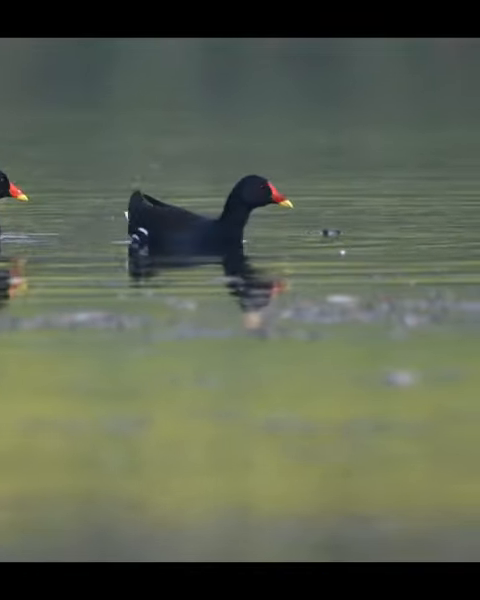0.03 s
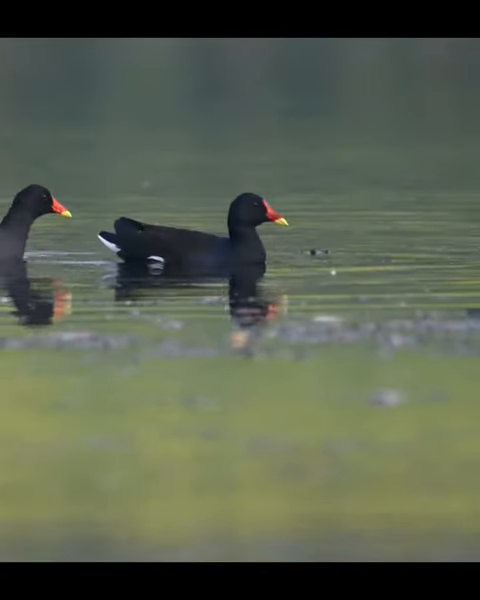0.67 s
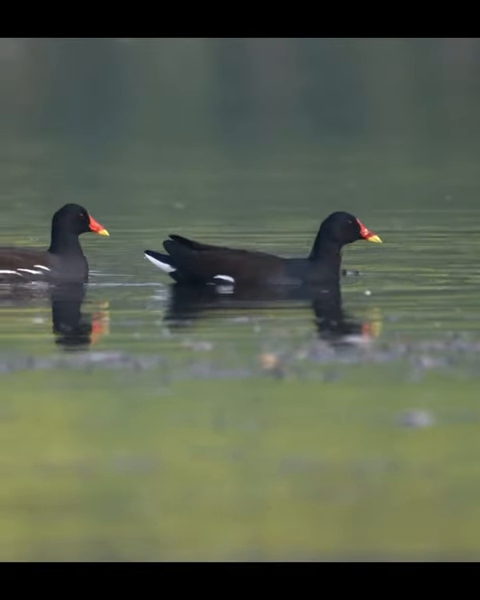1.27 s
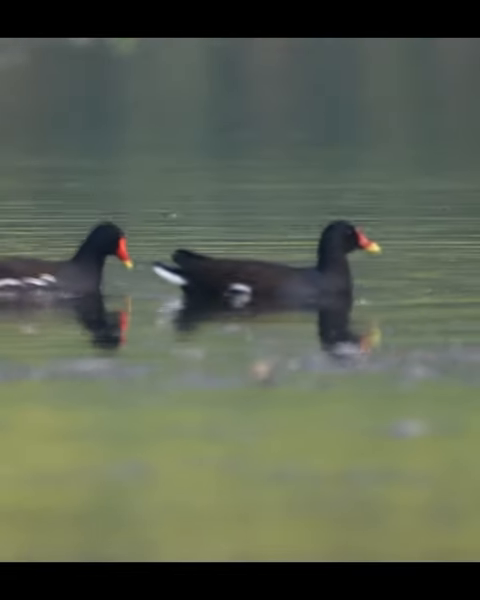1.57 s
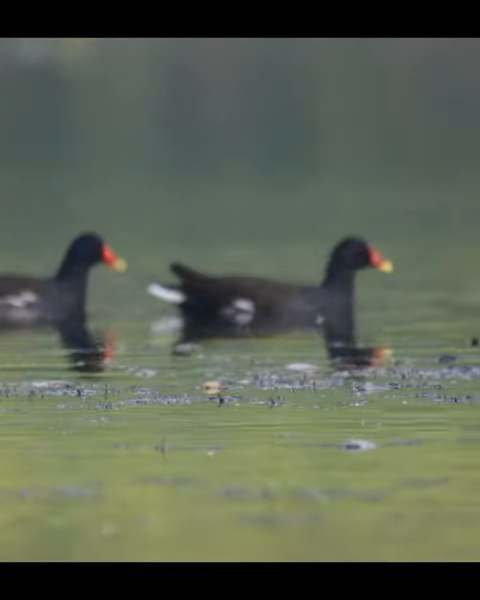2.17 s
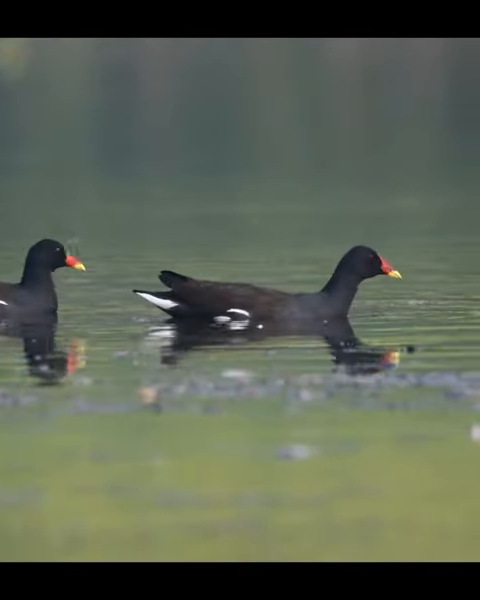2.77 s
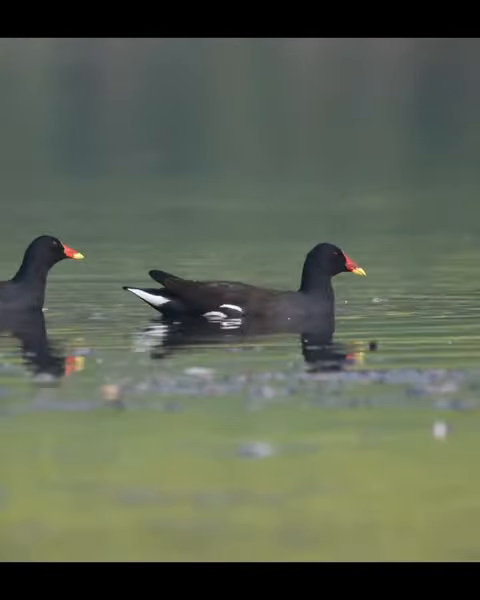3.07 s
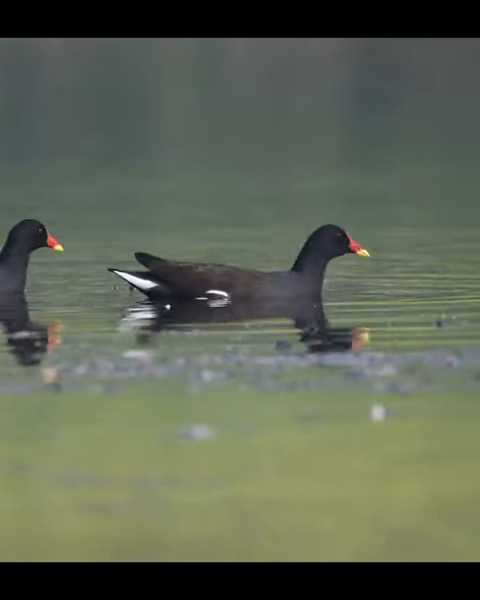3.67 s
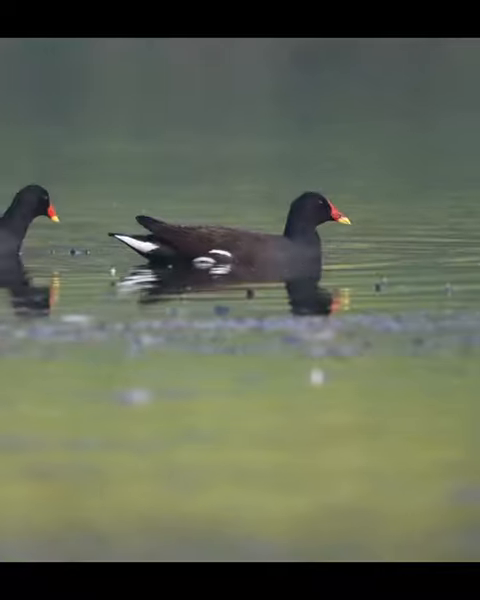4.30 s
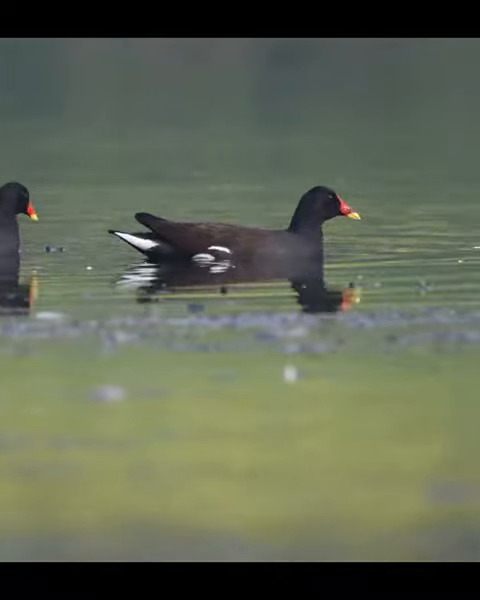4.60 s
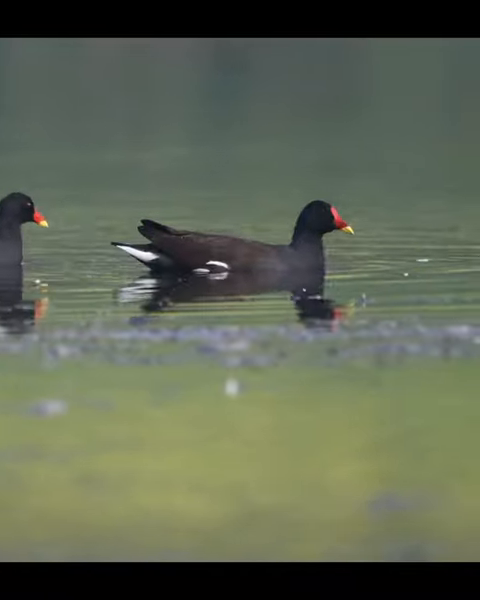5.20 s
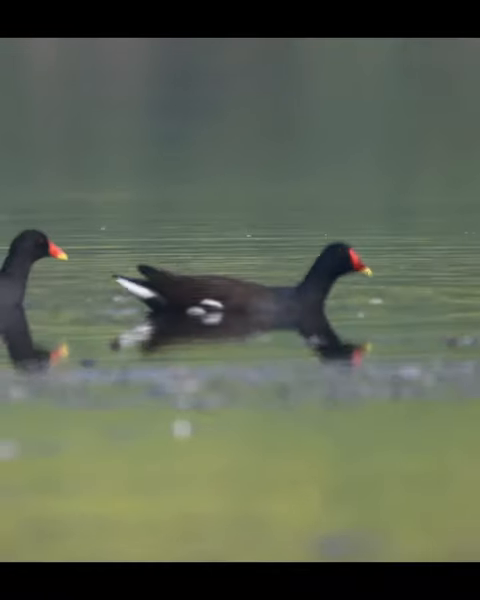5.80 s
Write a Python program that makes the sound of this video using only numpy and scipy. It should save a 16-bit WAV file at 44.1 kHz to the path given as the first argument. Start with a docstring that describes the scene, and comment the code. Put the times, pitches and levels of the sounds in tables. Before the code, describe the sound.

Moorhens call close by on a pond, each call very short, with a slight echo from reeds and bank. A sharp, piercing kek opens at 0.1 seconds. Three round clucks follow at 0.5, 0.9 and 1.2, the first the loudest and slightly overloaded. Two more keks come at 1.8 and 2.3. From 3.0 to 3.4 there is a quick cry of three falling notes. A rasping squawk sounds at 3.8, two clucks at 4.3 and 4.7, a second squawk at 4.9 and a last kek at 5.4.

Behind them, bush crickets hiss faintly and steadily, the nearest to the right, over a soft distant hum. Tiny dry ticks come now and then, clustering around 1.5 seconds. A light breeze rumbles on the microphones, a little more on the left, with its strongest buffets between 3.5 and 4.8 seconds.

```python
"""Moorhens on a pond

A pair of microphones by the water takes round clucks, sharp keks, a three-note cry and two rasping
squawks, each voiced in the syrinx, shaped by the throat and echoed by near reeds and the wooded bank.
Bush crickets hiss in the reeds, small dry ticks come now and then, and a breeze buffets the microphones.
The loudest calls overload the input."""
import sys
import numpy as np
from scipy import signal
from scipy.fft import rfft, irfft, next_fast_len
from scipy.io import wavfile
from scipy.ndimage import map_coordinates

SR = 44100
rng = np.random.default_rng(int(sys.argv[2]) if len(sys.argv) > 2 else 0)


def wrap_up_sound(samples):
    """Save the sound to the file named by the first command line argument, as 16-bit audio."""
    columns = np.atleast_2d(samples).T
    # keep every value between -1 and 1, then stretch to whole-number steps
    tamed = np.clip(columns, -1, 1)
    steps = np.round(tamed * 32767).astype(np.int16)
    wavfile.write(sys.argv[1], SR, steps)


N = 266805

# Levels in the tables are relative: each source adds its own gain. Roughness runs from 0 to 1.
# Each row: start in seconds, length in seconds, top pitch in Hz, level in dB, roughness,
# closing note in dB.
CLUCK_CALLS = [ (.539, 0.061, 1043, -0.5, 0.005, -3), (.870, 0.082, 1071, -5, 0.055, -8),
               (1.239, 0.063, 1069, -3.5, 0.0067, -4.5), (4.331, .076, 1077, -4.5, 0.057, -5.5),
               (4.712, 0.056, 1058, -2.5, 0.011, -6)]
# Each row: start in seconds, length in seconds, pitch in Hz, level in dB, lead-in length and attack
# in seconds, lead-in level in dB, closing rasp in dB.
KEK_CALLS = [ (.077, 0.04, 1010, -9.5, 0.058, 0.055, -8.5, -11.5),
             (1.803, .038, 1010, -10.5, 0.062, 0.009, -16, -9.5),
             (2.256, 0.047, 1011, -13, .084, 0.059, -12, -12),
             (5.436, 0.045, 1016, -11.5, 0.076, 0.067, -10, -13)]
# Each row: start in seconds, length in seconds, pitch in Hz, level in dB, roughness, throat resonance
# and shoulder pitch in Hz, scoop length in seconds, scoop and tail levels in dB.
CRY_NOTES = [ (3.040, 0.045, 963, -7.5, 0.059, 2900, 878.4, 0.049, -7, -7.5),
             (3.165, .058, 845.5, -13, 0.022, 2313, 809, 0.033, -9.5, -19),
             (3.291, 0.066, 788.7, -7, 0.18, 2370, 799, .044, -10.5, -16.5)]
# Each row: start in seconds, length in seconds, pitch in Hz, level in dB, hoarse rise in dB,
# accent pitch in Hz, accent level in dB.
SQUAWK_CALLS = [ (3.838, .066, 827.7, -6, -11.5, 943, -12), (4.937, .066, 827, -6.5, -13.5, 938, -12)]
# Each row: start in seconds, length in seconds, pitch in Hz, level in dB, octave against the note in dB.
COO_NOTES = [(3.165, 0.082, 838, -33.5, -12), (3.312, 0.051, 792.5, -23, -18), (3.638, 0.056, 858, -30, -8),
             (3.682, 0.075, 849, -47.5, 14.5), (3.919, 0.024, 931, -22, -24),
             (5.023, 0.033, 924, -24.5, -10)]
# Colour of each call through neck and bill. Each row: frequency in Hz, level in dB.
CLUCK_COLOUR = [(500, -40.5), (830, -26.5), (1050, -4.5), (1350, 18), (1700, 6), (2150, 0), (2700, -58),
                (3200, -14.5), (4200, -9.5), (6000, -16), (10000, -22), (15000, -50.5)]
KEK_COLOUR = [(400, -33), (850, 3), (1050, 11.5), (1350, 0), (1750, 14), (2300, 18), (3000, 10),
              (3500, 8.5), (4300, -2), (5300, 1), (7000, -9.5), (9500, -12.5), (11000, -39), (14000, -23)]
CRY_COLOUR = [(400, -17), (830, -12), (1250, -0.5), (1680, 9.5), (2100, 3.5), (2600, -1.5), (3300, -6.5),
              (4000, -7.5), (5000, -23), (8000, -12), (10000, -28), (15000, -35)]
SQUAWK_COLOUR = [(400, -18.5), (850, -14.5), (1100, -1.5), (1400, 11), (1700, 9), (2200, 0.5), (2800, -6),
                 (3300, 0.5), (4100, -3), (5200, -16), (8000, -22.5), (11000, -32.5), (15000, -40)]
# The birds at the two microphones. Each row: frequency in Hz, left over right in dB, left lead in radians.
MIC_DIFFERENCES = [(400, 1, 0), (830, 4, 0), (1050, 6, .7), (1350, 0, 3.5), (1670, -10, 4), (1900, -18, 5),
                   (2130, -19, 6.1), (2380, -8, 5.4), (2650, -5, 7.5), (2900, 6, 6.4), (3300, -2, 5.9),
                   (4050, 4, 6.6), (4600, -1, 5.3), (9000, -3, 5.5)]
# Echo of the wooded bank. Each row: frequency in Hz, time to fall 60 dB in seconds.
BANK_DECAY = [(300, 0.53), (1000, 0.47), (2000, 0.71), (3000, 0.6), (4000, 0.63), (5500, 0.045),
              (12000, 0.33)]
# Each row: start in seconds, level in dB, offset of the low ring in dB.
DRY_TICKS = [(0.723, -31.5, 11), (1.065, -29, -22), (1.216, -27, 3), (1.4596, -26, -3),
             (1.4805, -25.5, 14.5), (1.4946, -30, 6), (1.57, -29, 9), (1.6164, -24.5, 6), (1.718, -26, 13),
             (1.732, -24.5, 8.5), (2.094, -26.5, 8), (2.178, -30, 15), (2.666, -28, 7), (4.555, -23.5, 3.5),
             (5.6575, -32, -24), (5.68, -38.5, -13), (5.8913, -23.5, 8.5), (5.9721, -27, 3)]
# The nearest cricket and the chorus in the reeds. Each row: frequency in Hz, level in dB.
CRICKET_SPECTRUM = [(4000, -29.5), (4800, -24.5), (5250, -3.5), (5550, 5), (6000, -5), (6400, -1),
                    (7200, -65), (8000, -34)]
CHORUS_SPECTRUM = [(4000, -21.5), (5000, 4.5), (5600, -2), (6100, 10.5), (6350, -48), (6650, 8), (7100, 2),
                   (7500, -6.5), (8000, -56)]
# The steady breeze on the microphones. Each row: time in seconds, level in dB.
BREEZE_LEVELS = [(0, -46), (1.2, -47), (1.32, -33.5), (1.58, -44), (1.72, -46.5), (3.38, -44),
                 (3.47, -27.5), (3.66, -35), (4.3, -39.5), (4.78, -29.5), (4.9, -47), (5.05, -35),
                 (5.2, -38), (5.52, -30), (5.65, -41.5), (6.05, -44)]
# Each row: time of the peak in seconds, length in seconds, level in dB.
BREEZE_GUSTS = [(0.218, 0.022, -27.5), (1.278, 0.023, -25), (1.553, 0.077, -28.5), (3.105, 0.025, -33),
                (3.567, 0.043, -24), (3.713, 0.048, -14.5), (3.763, 0.066, -19.5), (3.958, 0.042, -14),
                (4.035, 0.053, -17), (4.145, 0.05, -21), (4.277, 0.038, -19), (4.381, 0.081, -23),
                (4.594, 0.037, -23.5), (4.719, 0.073, -21), (5.114, 0.02, -28), (5.574, 0.021, -27)]
# Wind buffet, far hum, open air and high fizz. Each row: frequency in Hz, level in dB.
BUFFET_SPECTRUM = [(12, -54), (20, -34), (59, 2.5), (114, 1.5), (179, -7), (252, -18), (278, -18),
                   (392, -23), (600, -36), (780, -85), (1320, -120)]
HUM_SPECTRUM = [(60, 1.5), (130, 4.5), (260, -13), (450, -4), (600, -16.5), (850, -11.5), (1400, -44)]
AIR_SPECTRUM = [(200, -45), (500, -5.5), (650, -17), (900, -1.5), (1700, -2.5), (2600, -10.5), (4500, -27),
                (6000, -28.5)]
FIZZ_SPECTRUM = [(3000, 3), (4500, 5), (7500, -20), (9000, -10), (11000, -6), (13000, -19), (15500, -33)]


def clucks():
    """Round clucks arch on their second harmonic, then drop to a short low note."""
    close_hz = 818.6
    notes = []
    for start, length, hz, db, rough, close_db in CLUCK_CALLS:
        notes += [
            note(start, length, hz, db, rough, throat_hz=2 * hz, attack_s=.006, release_s=.01,
                 sag=.115, droop_db=5, rise=-.03, fray=.14),
            note(start + length, .016, close_hz, close_db, rough=.09, throat_hz=2 * close_hz,
                 attack_s=.005, release_s=.035)]
    call = voice(notes, CLUCK_COLOUR, gain_db=-3, peak_db=18, width_hz=894,
                 flutter_db=3.5, flutter_hz=86.2, jitter=.03, rasp_hz=705, rasp_gain=2)
    return pond_echoes(call, reeds_db=-11.5, reeds_t60=.18, bank_db=-36.5)


def keks():
    """A soft lead-in cracks, jumps to a piercing fourth harmonic and ends in a rasp."""
    lead_hz, close_hz, crack_s = 863.7, 810, .018
    notes, other_side = [], []
    for start, length, hz, db, lead_s, lead_attack_s, lead_db, close_db in KEK_CALLS:
        notes += [
            note(start - lead_s, lead_s, lead_hz, lead_db, rough=.22, throat_hz=2 * lead_hz,
                 attack_s=lead_attack_s),
            note(start - crack_s, crack_s, lead_hz, db=-5.5, rough=.66, throat_hz=1750,
                 attack_s=.013, release_s=.0065),
            note(start, length, hz, db, rough=.03, throat_hz=4030,
                 attack_s=.004, sag=.05, fray=.45, droop_db=1),
            note(start + length, .0099, close_hz, close_db, rough=.74, throat_hz=1640, release_s=.037)]
        # The other side of the syrinx joins in on a pitch of its own.
        other_side.append(note(start, length, hz=901.6, db=db - 10, rough=.37, throat_hz=4480, sag=.029))
    call = voice(notes, KEK_COLOUR, gain_db=-2, peak_db=18, width_hz=320,
                 flutter_db=4.5, flutter_hz=73.1, jitter=.017, rasp_hz=570, rasp_gain=.9)
    call += voice(other_side, KEK_COLOUR, gain_db=-1, peak_db=21, width_hz=200,
                  flutter_db=4, flutter_hz=55.6, jitter=.014, rasp_hz=450, rasp_gain=.8)
    return pond_echoes(call, reeds_db=-12, reeds_t60=.19, bank_db=-13.5)


def cry():
    """Three falling notes on the third harmonic, each scooped from a rough shoulder and returning to it."""
    notes = []
    for start, length, hz, db, rough, throat_hz, shoulder_hz, scoop_s, scoop_db, tail_db in CRY_NOTES:
        notes += [
            note(start - scoop_s, scoop_s, shoulder_hz, scoop_db, rough=.33, throat_hz=3 * shoulder_hz,
                 attack_s=.019, rise=.06),
            note(start, length, hz, db, rough, throat_hz, sag=.02, fray=.033, rise=.018),
            note(start + length, .03, shoulder_hz, tail_db, rough=.14, throat_hz=3 * shoulder_hz,
                 release_s=.054, swell_db=-7)]
    call = voice(notes, CRY_COLOUR, gain_db=-1.5, peak_db=21, width_hz=160,
                 flutter_db=5, flutter_hz=76.7, jitter=.015, rasp_hz=650, rasp_gain=.8)
    return pond_echoes(call + coos(), reeds_db=-9, reeds_t60=.14, bank_db=-37)


def squawks():
    """A hoarse rise glides to a held fourth harmonic; a higher accent follows and breaks into a rasp."""
    rise_hz, rise_s, glide_s = 670, .08, .034
    gap_s, accent_s = .0073, .058
    notes = []
    for start, length, hz, db, rise_db, accent_hz, accent_db in SQUAWK_CALLS:
        accent_at = start + length + gap_s
        notes += [
            note(start - rise_s, rise_s, rise_hz, rise_db, rough=.3, throat_hz=2 * rise_hz,
                 attack_s=.031, rise=.27, swell_db=-8),
            note(start - glide_s, glide_s, hz=712, db=-10, rough=.25, throat_hz=2980,
                 attack_s=.0027, rise=.114, swell_db=7),
            note(start, length, hz, db, rough=.025, throat_hz=3300,
                 release_s=.016, sag=.037, fray=.61, rise=.0059, droop_db=2),
            note(accent_at, accent_s, accent_hz, accent_db, rough=.069, throat_hz=2880,
                 sag=.077, fray=.9, droop_db=-4.5),
            note(accent_at + accent_s, .023, hz=745, db=-11, rough=.63, throat_hz=1800,
                 release_s=.013, rise=-.023)]
    call = voice(notes, SQUAWK_COLOUR, gain_db=-2, peak_db=9, width_hz=260,
                 flutter_db=2, flutter_hz=72.3, jitter=.015, rasp_hz=480, rasp_gain=.75)
    return pond_echoes(call, reeds_db=-6.5, reeds_t60=.22, bank_db=-67)


def coos():
    """Short, steady low notes of the throat, each a tone and its octave."""
    out = np.zeros(N)
    for start, length, hz, db, octave_db in COO_NOTES:
        n = int(length * SR)
        phase = 2 * np.pi * np.cumsum(hz * (1 + .014 * wobble(63, n))) / SR
        tone = np.sqrt(2) * (np.sin(phase) + amp(octave_db) * np.sin(2 * phase))
        out[int(start * SR):][:n] += amp(db) * tone * signal.windows.tukey(n, .3)
    return out


def note(start, length, hz, db, rough, throat_hz, attack_s=.0037, release_s=.0042,
         sag=0, fray=0, droop_db=0, rise=0, swell_db=0):
    """One push of air: its start, then curves of pitch, level, roughness and throat resonance."""
    fade_db = 25.5
    t = np.arange(int((length + release_s) * SR)) / SR
    from_middle = np.minimum(t / length, 1) - .5
    # Effort slackens at both ends: pitch sags, tone frays, level droops. Rise and swell slant the arch.
    slack = np.abs(2 * from_middle) ** 3
    bend = 1 - sag * slack + rise * from_middle
    closed = np.maximum(1 - t / attack_s, 0) + np.maximum(t - length, 0) / release_s
    level_db = db + swell_db * from_middle - droop_db * slack - fade_db * closed
    return start, hz * bend, level_db, rough + fray * slack, throat_hz * bend


def voice(notes, colour, gain_db, peak_db, width_hz, flutter_db, flutter_hz, jitter, rasp_hz, rasp_gain):
    """Harmonics of the syrinx through a moving throat resonance; roughness smears each into a band."""
    out = np.zeros(N)
    harmonics = np.arange(1, 19)[:, None]
    for start, pitch, db, rough, throat_hz in notes:
        n = len(pitch)
        rough = np.clip(rough * rasp_gain, 0, .95)
        pitch = pitch * (1 + jitter * np.sqrt(rough) * wobble(361, n))
        # A clean note locks on to the resonance and is nearly a single tone.
        detuning = (harmonics * pitch - throat_hz) / width_hz
        resonance = 1 + amp(peak_db) * (1 - rough) / (1 + detuning ** 4)
        weights = amp(along(colour, harmonics * pitch)) * resonance
        weights /= np.linalg.norm(weights, axis=0)
        # High harmonics, and those outside the resonance, break up first.
        unrest = rough * (.9 + (harmonics / 3.2) ** 2) / np.sqrt(resonance)
        smear = unrest / (unrest + 1 - rough)
        chaos = unit(np.array([wobble(rasp_hz, n) + 1j * wobble(rasp_hz, n) for _ in harmonics]))
        tones = np.exp(2j * np.pi * harmonics * np.cumsum(pitch) / SR)
        partials = (np.sqrt(1 - smear) + np.sqrt(smear) * chaos) * tones
        # The membranes flutter at an uneven rate.
        flutter_rate = flutter_hz * (1 + .41 * wobble(60.2, n))
        flutter = flutter_db * np.sin(2 * np.pi * np.cumsum(flutter_rate) / SR)
        sound = np.sqrt(2) * amp(db + gain_db + flutter) * (weights * partials.real).sum(0)
        out[max(int(start * SR), 0):][:n] += sound * signal.windows.tukey(n, .04)
    return out


def pond_echoes(call, reeds_db, reeds_t60, bank_db):
    """The call with its echoes: near reeds scatter it at once, the far trees answer with a longer tail."""
    def echo(tail):
        return signal.fftconvolve(call[None], unit(tail) / np.sqrt(SR), axes=1)[:, :N]

    hz, frame_s, noise = signal.stft(rng.standard_normal((2, SR)), SR, nperseg=256)
    bank_decay = amp(-60 * frame_s / along(BANK_DECAY, hz)[:, None])
    bank_tail = signal.istft(noise * bank_decay, SR, nperseg=256)[1][:, :SR]
    # The reeds stand in clumps near the birds: uneven echoes, much the same at both microphones.
    t = np.arange(SR) / SR
    scatter = rng.standard_normal(SR) + .5 * rng.standard_normal((2, SR))
    clumps = amp(6 * wobble(160, SR))
    build_up = (1 - np.exp(-t / .02)) ** 2
    reed_tail = scatter * clumps * amp(-60 * t / reeds_t60) * build_up
    near = microphone_pair(call + amp(reeds_db) * echo(reed_tail))
    return near + amp(bank_db) * echo(bank_tail) * pan(-5.5)


def microphone_pair(sound):
    """Sound from near the birds reaches each microphone with its own level and phase."""
    def response(hz):
        half = amp(along(MIC_DIFFERENCES, hz) / 2) * np.exp(.5j * along(MIC_DIFFERENCES, hz, column=2))
        pair = np.array([half, 1 / half])
        return pair / np.sqrt(np.mean(np.abs(pair) ** 2, axis=0))
    return filtered(sound, response)


def ticks():
    """Tiny dry clicks: a bright snap over a lower ring."""
    snap_level, ring_level = np.zeros(N), np.zeros(N)
    t = np.arange(SR // 50) / SR
    for start, db, ring_db in DRY_TICKS:
        envelope = amp(db - 60 * t / .016) * (1 - np.exp(-t / .0007))
        snap_level[int(start * SR):][:len(t)] += envelope
        ring_level[int(start * SR):][:len(t)] += envelope * amp(ring_db)
    snap = rush([(5000, -17), (7000, -13), (8800, 6), (11000, -25.5), (15000, -39)])
    ring = rush([(1500, -27), (3300, -3), (5000, -1.5), (7000, -45)])
    return amp(-3) * snap_level * snap + amp(-7) * ring_level * ring


def bush_crickets():
    """A steady chorus in the reeds, and the quick wing beat of the nearest cricket, off to the right."""
    wing_hz = 80 * (1 + .07 * wobble(26))
    beat = np.sin(2 * np.pi * np.cumsum(wing_hz) / SR)
    nearest = amp(-42.5 + 3.2 * beat + 1.95 * wobble(5.46)) * rush(CRICKET_SPECTRUM) * pan(-11)
    chorus = amp(-41.5) * rush(CHORUS_SPECTRUM) * pan(1.1)
    return nearest + chorus


def breeze():
    """A steady breeze and short gusts buffet each microphone on its own, the left one harder."""
    t = np.arange(N) / SR
    power = amp(np.interp(t, *np.transpose(BREEZE_LEVELS))) ** 2
    for peak_at, length, db in BREEZE_GUSTS:
        power += amp(db) ** 2 * np.exp(-np.pi * ((t - peak_at) / length) ** 2)
    lumps = amp(4 * np.array([wobble(28), wobble(28)]))
    return amp(3.5) * np.sqrt(power) * unit(lumps * rush(BUFFET_SPECTRUM)) * pan(4.2)


def open_air():
    """A far hum in the centre, with a wide wash of air and a faint high fizz."""
    hum = amp(-41.5) * rush(HUM_SPECTRUM)[0]
    wash = amp(-46) * rush(AIR_SPECTRUM) * pan(-.9)
    fizz = amp(-48) * rush(FIZZ_SPECTRUM) * pan(-.48)
    return hum + wash + fizz


def amp(db):
    """Decibels to gain."""
    return 10 ** (np.asarray(db) / 20)


def unit(x):
    """Scale to rms 1."""
    return x / np.sqrt(np.mean(np.abs(x) ** 2) + 1e-20)


def along(table, hz, column=1):
    """One column of a frequency table, read on a log axis."""
    columns = np.transpose(table)
    return np.interp(np.log(hz + 1), np.log(columns[0] + 1), columns[column])


def wobble(rate, size=N):
    """A smooth random curve, rate knots a second."""
    return map_coordinates(rng.standard_normal(size=512), [np.arange(size) * rate / SR], mode="wrap")


def filtered(x, response):
    """x through a complex frequency response."""
    size = next_fast_len(N + SR // 2)
    return irfft(rfft(x, size) * response(np.fft.rfftfreq(size, 1 / SR)), size)[..., :N]


def rush(spectrum):
    """Coloured noise of rms 1, unrelated in the two channels."""
    return unit(filtered(rng.standard_normal((2, N)), lambda hz: amp(along(spectrum, hz))))


def pan(left_db):
    """Left and right gains for a level difference."""
    return amp(np.array([[left_db], [-left_db]]) / 2)


def scene():
    """The birds in front, the pond's background behind them."""
    moorhens = clucks() + keks() + cry() + squawks()
    return moorhens + ticks() + bush_crickets() + breeze() + open_air()


def record(dry):
    """The microphone input rounds off the loudest peaks and keeps nothing above its band limit."""
    band_limit_hz = 15600
    clipped = dry / (1 + np.abs(dry) ** 10) ** (1 / 10)
    return filtered(clipped, lambda hz: hz < band_limit_hz)


dry = scene()
out = record(dry)
wrap_up_sound(out)
```